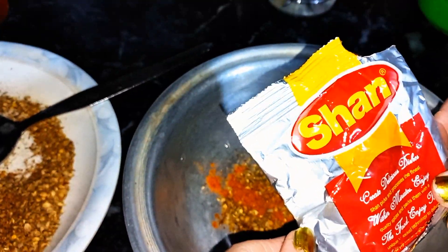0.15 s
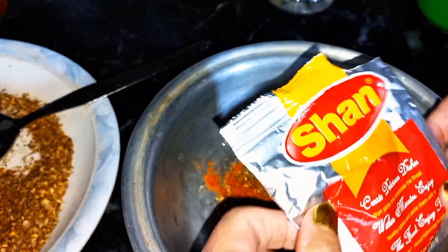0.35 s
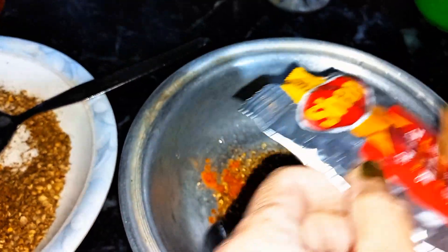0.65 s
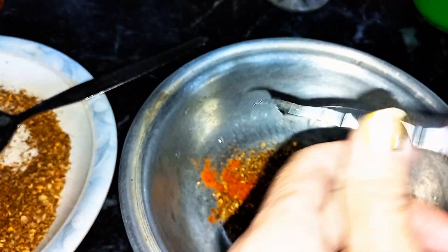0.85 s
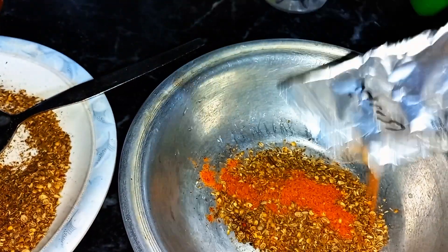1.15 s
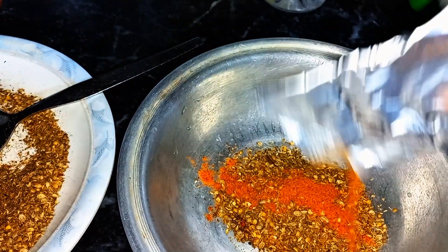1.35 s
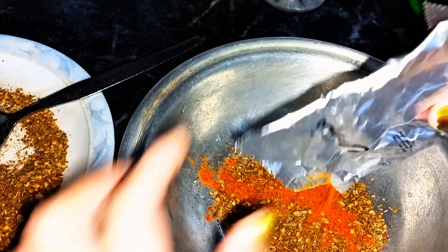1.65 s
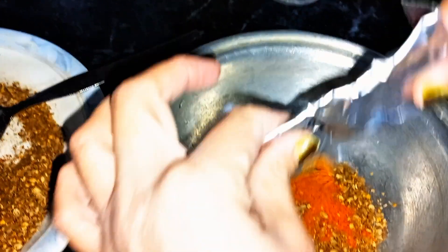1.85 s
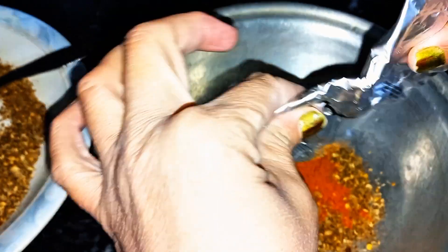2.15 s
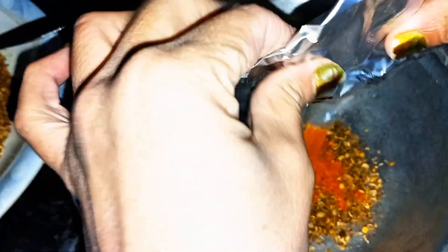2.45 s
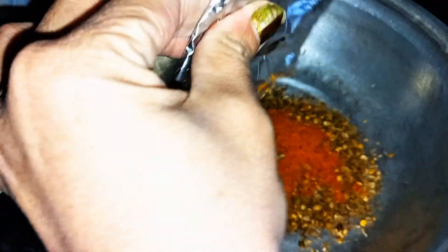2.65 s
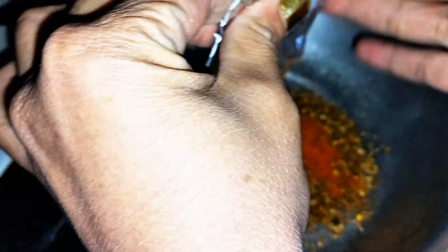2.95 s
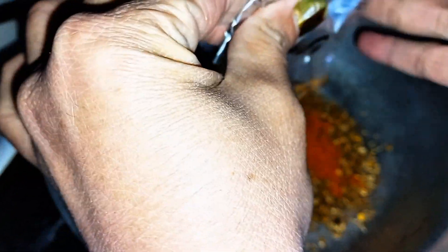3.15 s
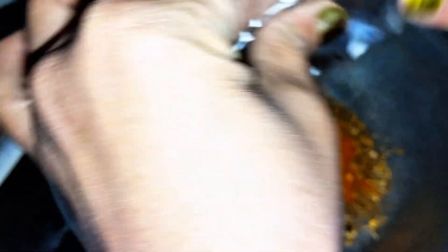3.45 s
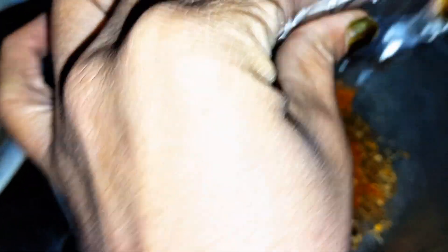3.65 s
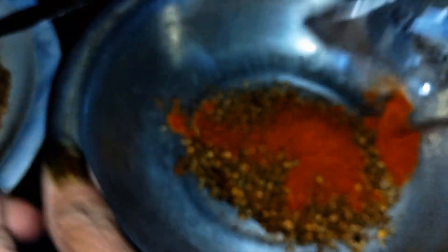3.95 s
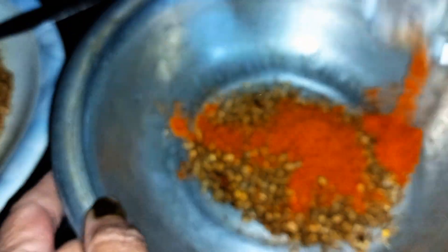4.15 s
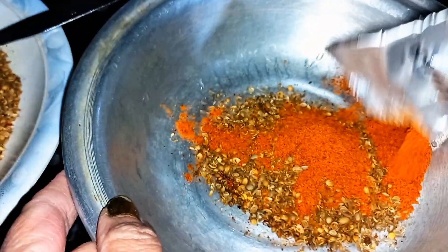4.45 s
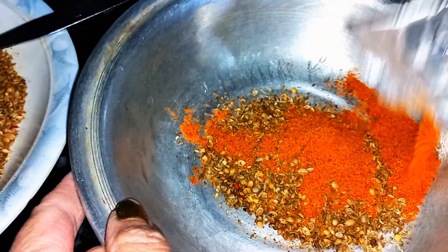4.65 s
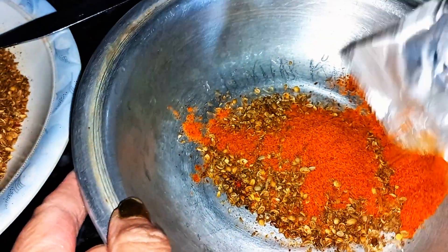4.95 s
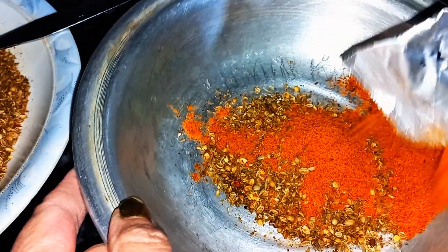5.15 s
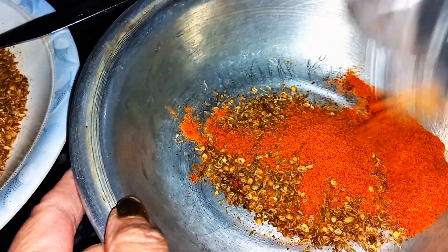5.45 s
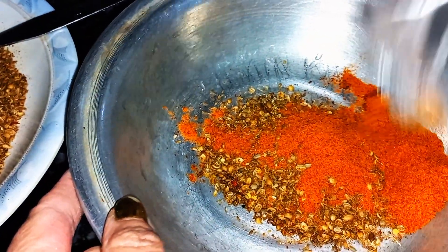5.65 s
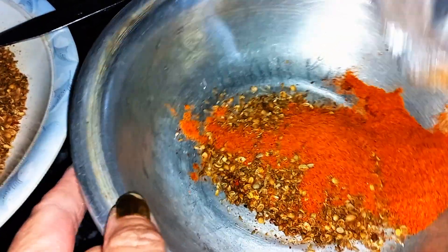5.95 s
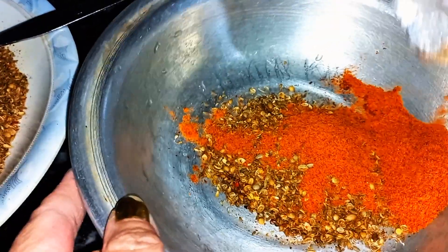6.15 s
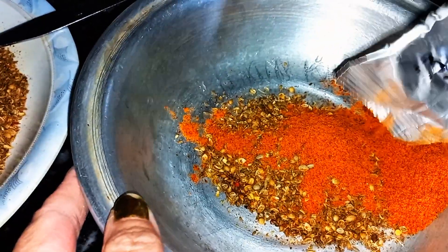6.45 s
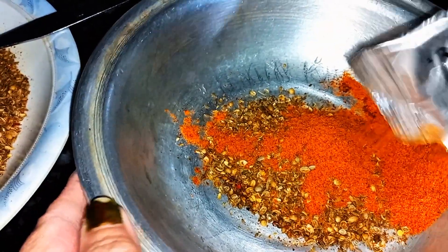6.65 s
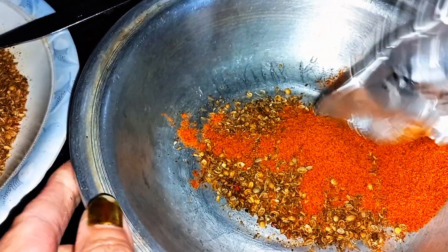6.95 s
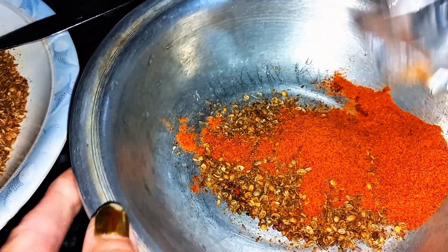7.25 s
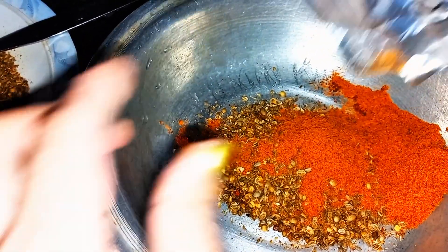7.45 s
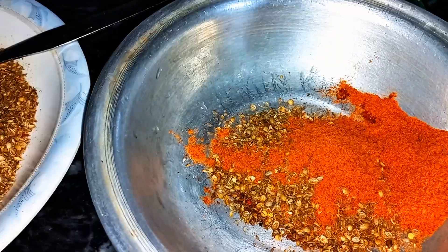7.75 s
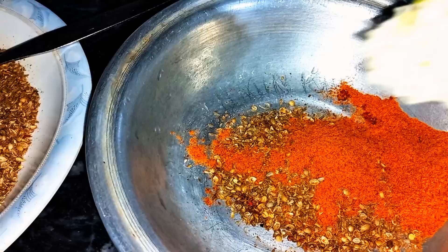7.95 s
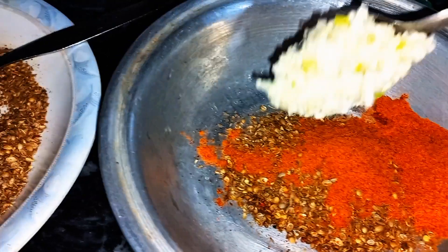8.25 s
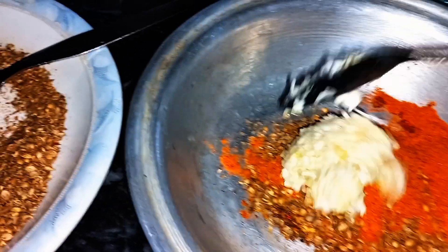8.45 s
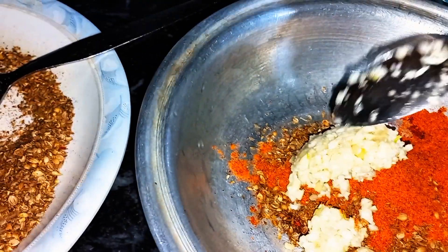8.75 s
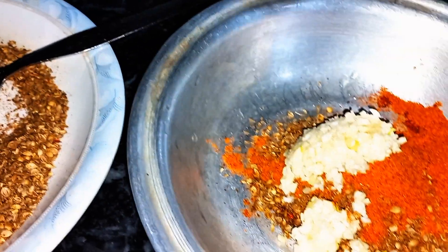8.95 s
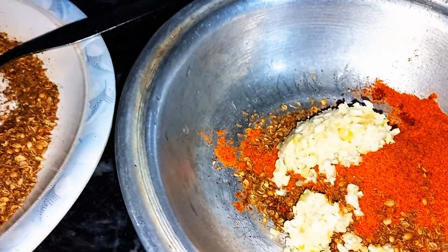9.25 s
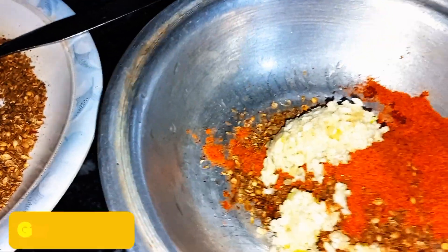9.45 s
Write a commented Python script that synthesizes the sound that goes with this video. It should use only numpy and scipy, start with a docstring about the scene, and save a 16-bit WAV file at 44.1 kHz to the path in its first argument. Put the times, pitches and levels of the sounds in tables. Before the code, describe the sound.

Close up in a small hard kitchen, a foil sachet crinkles with bright, dry snaps, mostly toward the left. Squeezing grows into dense crackling bursts, then regular shakes, about five or six a second, toss out powder with a soft hiss. After a last crackle the sound cuts abruptly to near quiet: low appliance hum, faint ticks and a few dull knocks on a steel bowl.

```python
"""In a small hard kitchen, a foil sachet is squeezed and shaken empty over a steel bowl, mostly louder in the left port.
Creases snap as bright cracks with ringing foil panels; tiny folds and hissing powder follow the hand movements.
Damped bowl modes knock, low pushes bump the table, narrow hisses slide by.
Feedback delays answer as the kitchen, over banded room noise and an appliance hum made of wavering tones.
Late on, a cut stops the echo and the hand movements of the first part short."""
import sys
import numpy as np
from scipy import signal
from scipy.fft import rfft, irfft, next_fast_len
from scipy.io import wavfile

SR = 44100
rng = np.random.default_rng(int(sys.argv[2]) if len(sys.argv) > 2 else 0)


def store_wav(level_fs):
    """Save 16-bit WAV to argv[1]."""
    pcm = np.round(np.clip(np.atleast_2d(level_fs), -1, 1) * 32767)
    wavfile.write(sys.argv[1], SR, pcm.T.astype(np.int16))


N = 423712   # samples
CUT_S = 7.719

# creases that snap loud or alone, and late faint ticks of the same kind:
# start_s, peak_db (before panning), treble_share_db, panel_pitch_hz, left_over_right_db
SNAPS = [(0.1697, -43, -16, 2280, 14), (0.363, -23, -13, 870, 6), (0.382, -20, -7.5, 2980, 6),
         (0.4052, -17.5, -1.5, 2250, 5), (0.434, -29.5, -16, 2210, 9), (0.508, -26.5, -10, 3080, 10),
         (0.5217, -8, 0, 2290, 4), (0.5445, -12, -2.5, 2230, 0), (0.6969, -22, -5, 1920, 6),
         (0.713, -22.5, -8, 2100, 5), (0.7299, -9, -4, 1740, 3.5), (0.7466, -14, 1, 3600, -9),
         (0.788, -25.5, -20, 1660, 3), (0.7694, -26, 1, 2860, -1), (0.7986, -28, -5, 1930, 7),
         (1.0066, -24.5, -4, 2500, 3), (1.0299, -15.5, -1, 2520, 2), (1.0963, -15, -0.5, 3000, 8),
         (1.6544, -42.5, -16, 1420, 15), (1.6958, -38, -21, 1740, 14), (1.7358, -27.5, -1, 3100, 6),
         (1.7757, -22, -1.5, 3470, 11), (1.8522, -26.5, -19, 1030, 4), (1.8826, -15.5, -6.5, 2080, 1),
         (1.9247, -13.5, -1.5, 1900, -6), (1.9386, -5, 0, 3120, 10), (1.9683, -13, -1.5, 2390, 5),
         (2.0133, -28, -25, 2020, 9), (2.024, -26, -29, 2350, 11), (2.0363, -5.5, -5, 2030, 1),
         (2.0417, -11.5, -4.5, 1250, 1), (2.0628, -15.5, -1.5, 1890, 5.5), (2.0923, -22, -12, 2250, 4),
         (2.1202, -23, -10, 1950, 1), (2.134, -15, -4, 2200, 3), (2.1514, -30, -21, 2150, 7),
         (2.167, -6, -1, 3450, 2), (2.2249, -28, 0, 2000, 2), (2.243, -26, 0, 2350, 4),
         (2.2498, -29, -9, 3620, 0), (2.28, -20.5, -0.5, 1960, 5), (2.356, -17.5, -5, 2060, 11.5),
         (2.3992, -33, -15, 2000, 4), (2.43, -16.5, -3.5, 2160, 5), (2.4648, -10.5, -2.5, 2160, 0),
         (2.4814, -10, -2, 1900, -6), (2.4886, -2.5, -1.5, 2330, 2), (2.5073, -17, -3, 1360, -1),
         (2.526, -21, -11, 2040, 3), (2.5364, -13, -1, 2140, 2), (2.545, -14, -2.5, 2220, 4),
         (2.5628, -16, -1.5, 2380, 3), (2.5995, -24, -5, 2200, 1), (2.7251, -31.5, -10, 1940, -1),
         (2.7628, -23, -8, 2080, 7), (2.7785, -27, 0, 860, 23), (2.9326, -18, -3.5, 2150, 7),
         (2.9658, -18.5, -2.5, 3070, 4), (3.0443, -21, -10, 2240, -3), (3.0598, -6, -3.5, 2220, 5),
         (3.0757, -8, -4, 2050, -3.5), (3.0847, -8.5, -6, 2330, 6), (3.0921, -9, 0, 2370, 10),
         (3.114, -25, -2, 2300, 0), (3.126, -12.5, -1.5, 2150, 4), (3.1435, -20, -6, 1920, 2),
         (3.21, -21, -11, 3700, 3), (3.2228, -10, -2, 2100, 5), (3.233, -2.5, -3.5, 1900, 2),
         (3.246, -14, -13, 2170, 5), (3.2557, -7, 1.5, 1830, -2), (3.263, -25, -18, 1790, -7),
         (3.2786, -17, -20, 2140, 14), (3.2978, -19, -12, 2100, -2), (3.308, -30.5, -12, 2630, 13),
         (3.342, -27, -6, 1970, 3), (3.3677, -17.5, -30, 2060, 3), (3.3776, -19.5, -9, 1980, 7),
         (3.3906, -33, -26, 2000, -5), (3.4381, -30, -28, 1970, -3), (3.454, -27, -5, 2000, 9),
         (3.471, -20.5, -20, 2000, 0), (3.4873, -17.5, -24, 2170, 3), (3.4955, -13, -25, 2320, 8),
         (3.51, -8.5, 0, 2110, 9), (3.513, -11, -8, 2280, 7), (3.5435, -18, -1, 1500, 2),
         (3.5583, -14, -1, 4000, -2), (3.6077, -28, -7, 2240, -4), (3.625, -12, -1, 2120, 3),
         (3.6495, -15, 1, 2090, 4), (3.6617, -27, -20, 734, 6), (3.6731, -25, -21, 726, 4),
         (3.682, -16.5, -2, 1840, 3), (3.7393, -12.5, -1, 2090, 7), (3.8308, -22.5, -1.5, 2680, 12),
         (3.8732, -23, -1.5, 2240, 8), (3.9555, -31.5, -14, 1480, 14.5), (4.0847, -24, -18, 1600, 7),
         (4.091, -12, -4, 2790, 2), (4.142, -13, -2, 1750, 6), (4.1713, -18.5, -1.5, 1830, 4),
         (4.2167, -19.5, -8.5, 1850, 0), (4.2357, -24, -9, 1790, 12), (4.2603, -18, -19, 2560, 5),
         (4.2726, -22.5, -11, 3250, 3), (4.3068, -19, -3, 2740, 5.5), (4.3212, -20, 0, 2970, 7),
         (4.4347, -12, -1, 2620, 5), (4.485, -21.5, -12, 3030, 10), (4.5328, -12, 0, 1700, 4.5),
         (4.6189, -16.5, -3.5, 2520, 7), (4.789, -13, -10.5, 2330, -1), (4.7945, -11, -1.5, 3400, -1),
         (4.972, -17.5, -6, 1790, 1.5), (5.0343, -20.5, -2, 2820, 11), (5.1461, -13, -12, 2370, 8),
         (5.3282, -19.5, -22, 1860, 5), (5.4694, -22.5, -4.5, 2150, 7), (5.5062, -17, -14, 2760, 7),
         (5.5446, -19.5, -5.5, 3070, 7.5), (5.6936, -6.5, -1, 1420, 3), (5.722, -14.5, 2, 3940, 4),
         (5.8753, -11.5, -4.5, 2390, 9.5), (5.8818, -5.5, 1, 2960, 5), (5.8988, -18, 2, 2390, 8),
         (5.935, -27, -6, 2800, 5), (6.054, -13, -19.5, 1180, 9.5), (6.104, -6.5, -1, 2000, 2.5),
         (6.2445, -10.5, -6, 2150, 11), (6.289, -5, -1, 3000, 1.5), (6.3109, -14, -3.5, 2420, 1.5),
         (6.37, -28.5, -5.5, 2430, 4), (6.4622, -16, -11, 1760, 7.5), (6.4897, -18.5, -3, 2220, 9),
         (6.6655, -11.5, -7.5, 2410, 3), (6.875, -29, -1.5, 1750, 3), (6.8998, -21.5, -6, 1630, 1.5),
         (6.948, -30, 2, 1850, -1), (6.973, -9, -8, 1450, 10.5), (7.204, -5, -2, 2370, -5),
         (7.208, -9, -4.5, 3100, 3), (7.4044, -27, -3.5, 1600, 3), (7.42, -34, -21, 2020, 13),
         (7.441, -28.5, -3.5, 2300, 1), (7.488, -36.5, -7, 2700, 9), (7.5094, -33.5, -17, 2380, 13),
         (7.549, -23.5, -2, 3660, 4), (7.6588, -16, -2.5, 1900, -4), (7.664, -8, 1.5, 2000, 10),
         (7.668, -7.5, -2, 1290, -2), (7.682, -15, -2, 2020, 9), (7.708, -11, -10.5, 3500, 5.5),
         (7.8794, -30.5, 0, 1390, 9), (8.545, -48, -3, 3800, 5), (8.579, -43, -8, 3300, 9.5),
         (8.648, -40, -13, 3800, 5)]
# side and folding of the sachet as it is tipped or shaken: time_s, left_port_delay_s, folding_db
SACHET_POSE = [(0, 0.000051, -1.5), (1.1, 0.00004, -3), (1.14, 0.000077, -15), (1.62, 0.000094, -6.5),
               (1.7, 0.000031, 0.5), (3.85, 0.000029, -2), (4.1, .00026, -8), (4.4, .00026, -8),
               (7.3, .00024, -7.5), (7.6, 0.000011, -0.5), (7.72, 0.0000076, 0.5), (7.76, 0.0000056, -8.5),
               (8.4, 0.0000067, -5), (8.47, 0.0000076, -1)]
# squeezes and other hand movements: height_s, handling_db, swell_s, die_s
SQUEEZES = [(0.244, -60, 0.022, .025), (0.31, -58, 0.058, 0.073), (0.442, -43, 0.12, 0.066),
            (0.54, -52.5, 0.13, 0.12), (0.742, -44, 0.056, 0.14), (1.04, -55, 0.18, 0.23),
            (1.187, -38.5, .08, 0.096), (1.359, -46, 0.068, 0.067), (1.527, -51.5, 0.14, .11),
            (1.698, -67, 0.091, 0.039), (1.77, -66, .05, .2), (1.87, -47, 0.064, 0.092),
            (1.934, -39.5, 0.045, 0.076), (2.045, -39, 0.02, 0.048), (2.12, -46.5, 0.062, 0.044),
            (2.19, -61, .05, .2), (2.287, -51.5, 0.18, 0.042), (2.361, -41.5, 0.033, .02),
            (2.486, -33.5, 0.069, 0.11), (2.772, -59.5, 0.057, 0.12), (2.933, -54, 0.076, 0.18),
            (3.082, -30, 0.048, 0.012), (3.139, -41, 0.036, 0.034), (3.238, -36, 0.063, 0.12),
            (3.504, -31.5, 0.057, 0.083), (3.636, -41.5, .085, .08), (3.743, -45, .05, 0.028),
            (3.84, -50.5, 0.17, 0.24), (3.927, -44.5, 0.066, 0.049), (6.915, -55, 0.22, .1),
            (7.453, -52, 0.093, 0.23), (7.672, -37, 0.028, 0.26), (7.91, -57, 0.12, 0.3),
            (8.5, -65, 0.17, 0.33), (8.642, -63, .14, 0.14), (9.558, -50, .014, 0.016),
            (9.606, -61.5, 0.17, .1)]
# shakes that throw the powder out: height_s, handling_db, die_s
SHAKES = [(4.098, -44, 0.15), (4.269, -34.5, 0.076), (4.448, -38, 0.11), (4.627, -36.5, .07),
          (4.801, -38.5, 0.11), (4.987, -37, 0.069), (5.15, -39.5, 0.088), (5.339, -37.5, 0.066),
          (5.518, -39.5, 0.082), (5.703, -39.5, 0.12), (5.885, -35, 0.097), (6.071, -39.5, 0.11),
          (6.269, -39, 0.18), (6.473, -39, 0.13), (6.677, -40.5, 0.14), (6.982, -35.5, 0.084),
          (7.214, -37.5, 0.11)]
# colour of the foil: pitch_hz, density_db (per Hz, relative)
FOIL_COLOUR = [(250, -9.5), (500, 3), (950, -9), (1300, -1), (2200, -2.5), (3500, -3), (5300, -4),
               (7400, -2), (8700, -8.5), (10000, -1.5), (12500, -7), (15500, -7)]
# colour of the sliding powder: pitch_hz, density_db (per Hz, relative)
POWDER_COLOUR = [(500, -22.5), (1200, 0), (2300, 4.5), (5000, 3.5), (8000, 4.5), (11000, 2), (15500, 3.5)]
# colour of the left port over the right: pitch_hz, difference_db
PORT_COLOUR = [(400, -2.5), (1300, 2.5), (2400, 6), (4400, -7), (8100, 6.5), (15000, 2)]
# brief narrow hisses, as of something sliding: start_s, length_s, pitch_hz, width_hz, level_db (before fades)
SLIDES = [(1.52, .1, 2100, 200, -60), (5.025, .13, 3200, 1100, -46.5), (5.75, .28, 3250, 700, -51),
          (7.95, .1, 2100, 400, -53), (8.0, .09, 1700, 900, -57), (8.22, .33, 1620, 300, -59),
          (8.6, .08, 3900, 1200, -63)]
# dull knocks on the bowl: start_s, then level_db of each bowl mode in turn
KNOCKS = [(2.357, -22, -38, -33, -50, -46), (3.663, -17.5, -30, -40, -50, -50),
          (3.234, -21, -9.5, -24, -40, -40), (6.2445, -16, -37, -23.5, -37, -40),
          (7.981, -22.5, -24.5, -24, -55, -36), (9.3111, -14.5, -28.5, -31.5, -62, -70),
          (9.5559, -23, -14.5, -28.5, -30, -24.5), (9.561, -48, -21, -36, -47, -48)]
# damped modes of the loaded bowl: pitch_hz, t60_s
BOWL_MODES = [(460, 0.012), (1110, 0.0098), (2100, 0.022), (2840, 0.016), (4400, 0.0023)]
# soft bumps through the table: start_s, level_db (the swell tops about 4 dB above it), pitch_hz
BUMPS = [(1.654, -42.5, 118), (1.66, -47, 60.3), (1.915, -53, 65), (5.37, -42, 116), (5.375, -59, 60),
         (7.069, -47.5, 79), (7.936, -39, 109), (9.189, -42, 113)]
# colour of the room noise: pitch_hz, density_db (per Hz, relative)
AIR_COLOUR = [(22, -49), (60, -39.5), (95, -9.5), (140, -13.5), (340, -9), (520, -14.5), (720, -25.5),
              (1550, -29.5), (1800, -33.5), (2700, -36.5), (3300, -81), (5000, -72.5), (6400, -46),
              (8800, -65.5), (13000, -45)]
# how alike the room noise is in both ports: pitch_hz, correlation (no unit)
AIR_LIKENESS = [(60, 0.92), (130, 0.99), (290, 0.92), (640, 0.8), (1410, 0.078), (3100, 0.25), (6820, 0.78),
                (15000, 0.98)]
# appliance hum: pitch_hz, width_hz, level_db (before the background curve)
HUM = [(63, 42, -70.5), (115, 11, -55.5), (171.2, 25, -62), (246.8, 10.1, -44.5), (332, 23, -59)]
# slow level curve of room noise and hum: time_s, gain_db
BACKGROUND_LEVEL = [(0, 1), (4.5, 2), (5.5, 2.5), (7.7, 1.5), (7.75, 1), (9.61, 0.5)]

SNAP_T60_S, PANEL_T60_S = 0.0043, 0.006
FLUTTER_T60_S, FLUTTER_DB = 0.043, -17   # level against the onset of the snap
PORT_SHARE = 0.53   # share of foil noise power common to both ports
SWING_DB, STILL_DB = 21, -82   # change per swell or die time; handling at rest
SHAKE_SWELL_S, SHAKE_HOLD_S = 0.075, 0.0087
CRACKLE_DB, CRACKLE_SPREAD_DB = 11.5, 4.5   # lesser creases, over the handling
CRACKLE_HZ, CRACKLE_DULL_DB = 2100, 23   # middle panel pitch; range of random treble loss
CRACKLE_FOLLOWS = 1.66   # dB of crackle for a dB of folding
FOLD_SPREAD_DB = 5.5
POWDER_DB = -4   # against the handling
KITCHEN_T60_S, KITCHEN_DB, WALL_CUT_HZ = 0.33, -21, 3900   # T60 before the walls take treble
AIR_DB = -48.5   # before the background curve
TOP_CUT_HZ = 15800


def amp(db):
    """dB to gain."""
    return 10 ** (np.asarray(db) / 20)


def rms_one(x):
    """Scale to rms 1 along time."""
    return x / np.sqrt(np.mean(x ** 2, axis=-1, keepdims=True) + 1e-20)


def in_time(rows, s):
    """Curve columns read at the times s."""
    t, *columns = np.transpose(rows)
    return [np.interp(s, t, c) for c in columns]


def at_hz(points, hz):
    """Curve read on a log frequency axis."""
    points = np.array(points)
    return np.interp(np.log(hz), np.log(points[:, 0]), points[:, 1])


def port_tilt(hz):
    """Colour difference of the ports in dB, half to each."""
    return np.outer([.5, -.5], at_hz(PORT_COLOUR, hz))


def drift(rate_hz):
    """Slow random wander of about spread 1: noise low-passed twice at rate_hz."""
    r = np.exp(-80 * np.pi * rate_hz / SR)     # one value per 40 samples
    noise = rng.standard_normal(N // 40 + 2002)
    slow = signal.lfilter([1], [1, -2 * r, r * r], noise)[2000:]
    return np.interp(np.arange(N) / 40, np.arange(len(slow)), rms_one(slow))


def decay(t, t60):
    """Fall of 60 dB in t60."""
    return amp(-60 * t / t60)


def resonance(x, hz, width_hz):
    """Two-pole resonance, gain about 1 on top."""
    r = np.exp(-np.pi * width_hz / SR)
    poles = [1, -2 * r * np.cos(2 * np.pi * hz / SR), r * r]
    return signal.lfilter([(1 - r * r) / 2, 0, (r * r - 1) / 2], poles, x)


def creases(s, peak_db, treble_db, panel_hz, pan_db, size):
    """A crease is a bright crack plus a panel of foil ringing near one pitch, then a short flutter."""
    t = np.arange(size) / SR
    hz = np.maximum(np.fft.rfftfreq(size, 1 / SR), 30)
    noise = rng.standard_normal((len(s), 3, size))
    # each port hears the foil from its own side
    heard = rfft(np.sqrt(PORT_SHARE) * noise[:, :1] + np.sqrt(1 - PORT_SHARE) * noise[:, 1:])
    left_delay = in_time(SACHET_POSE, s)[0]
    heard[:, 0] *= np.exp(-2j * np.pi * np.outer(left_delay, hz))
    heard *= amp(at_hz(FOIL_COLOUR, hz) + port_tilt(hz))

    octaves = np.log2(hz / panel_hz[:, None, None])
    body = (np.exp(-(octaves / 0.22) ** 2) + 0.46) / (1 + (hz / 4800) ** 8)
    crack_hz = 5500 * 3.63 ** rng.random((len(s), 1, 1))     # every fold cracks with a colour of its own
    crack_octaves = np.log2(hz / crack_hz)
    bright = (np.exp(-(crack_octaves / 0.36) ** 2) + 0.98) / (1 + (4800 / hz) ** 8)

    flutter = amp(FLUTTER_DB) * decay(t, FLUTTER_T60_S)
    crack_shape = (decay(t, SNAP_T60_S) + flutter) * np.minimum(t / 0.00017, 1)
    panel_shape = (decay(t, PANEL_T60_S) + flutter) * np.minimum(t / 0.0015, 1)
    crack = rms_one(irfft(heard * bright, size) * crack_shape)
    panel = rms_one(irfft(heard * body, size) * panel_shape)
    treble = np.clip(amp(treble_db), .02, .98)[:, None, None]
    snap = treble * crack + np.sqrt(1 - treble ** 2) * panel
    snap *= (amp(peak_db) / np.abs(snap).max(axis=(1, 2)))[:, None, None]
    snap *= amp(np.outer(pan_db, [.5, -.5]))[:, :, None]

    # add every snap at its start
    at = (np.round(s * SR).astype(int)[:, None] + np.arange(size)).ravel()
    return np.array([np.bincount(at, snap[:, k].ravel(), N + size)[:N] for k in range(2)])


def handling(s):
    """Hand level in dB at the times s: movements swell and die; those of the first part stop at the cut."""
    power = np.full(len(s), amp(2 * STILL_DB))
    moves = [(*squeeze, 0) for squeeze in SQUEEZES]
    moves += [(top, db, SHAKE_SWELL_S, die, SHAKE_HOLD_S) for top, db, die in SHAKES]
    for top, level_db, swell, die, hold in moves:
        before = (top - hold / 2 - s) / swell
        after = (s - top - hold / 2) / die
        away = np.maximum(np.maximum(before, after), 0)
        near = (away < 3) & ((s < CUT_S) | (top > CUT_S))
        power[near] += amp(2 * (level_db - SWING_DB * away[near]))     # twice the dB gives power
    return 10 * np.log10(power)


def crackle():
    """Lesser, duller creases start at random moments up to the cut, as strong as handling and pose allow."""
    draw = rng.random((round(50 * CUT_S), 5))     # 50 a second
    s = draw[:, 0] * CUT_S
    chance_db = -CRACKLE_SPREAD_DB * np.log(np.maximum(draw[:, 1], .1))
    folding_db = CRACKLE_FOLLOWS * in_time(SACHET_POSE, s)[1]
    size_db = handling(s) + folding_db + CRACKLE_DB + chance_db
    treble_db = -5 - CRACKLE_DULL_DB * draw[:, 2]
    panel_hz = CRACKLE_HZ * 1.5 ** (draw[:, 3] - .5)
    return creases(s, size_db, treble_db, panel_hz, 11 * draw[:, 4], size=1280)


def rustle():
    """Many small folds at random moments with uneven sizes, over the fine hiss of sliding powder."""
    draw = rng.random((600 * N // SR, 4))     # 600 folds a second
    s = draw[:, 0] * N / SR
    chance_db = -FOLD_SPREAD_DB * np.log(np.maximum(draw[:, 1], 1 / 12))
    size_db = handling(s) + in_time(SACHET_POSE, s)[1] + 2.77 + chance_db
    treble_db = -1.5 - 1.4 * draw[:, 2]
    panel_hz = 900 * 4.2 ** draw[:, 3]
    folds = creases(s, size_db, treble_db, panel_hz, rng.normal(7.0, 10.6, len(s)), size=320)

    hz = np.maximum(np.fft.rfftfreq(N, 1 / SR), 30)
    colour = amp(at_hz(POWDER_COLOUR, hz) + port_tilt(hz))
    powder = irfft(rfft(rng.standard_normal((2, N))) * colour, N)
    flicker_db = 2 * drift(60)
    powder_gain = amp(handling(np.arange(N) / SR) + POWDER_DB + flicker_db)
    return folds + powder_gain * powder / np.std(powder)


def knocks():
    """Each knock sets the damped modes of the loaded bowl ringing, each with a rattling tail."""
    out, t = np.zeros(N + 4000), np.arange(4000) / SR
    onset = np.sin(np.pi / 2 * np.minimum(t / 0.0013, 1)) ** 2
    for s, *mode_db in KNOCKS:
        for db, (hz, t60) in zip(mode_db, BOWL_MODES):
            wide = resonance(rng.standard_normal(4000), hz, 0.69 * hz)
            rattle = rms_one(resonance(wide, hz, 0.31 * hz)) * amp(-22.5) * decay(t, 0.076)
            ring = decay(t, t60) * np.sin(2 * np.pi * hz * t)
            out[round(s * SR):][:4000] += amp(db) * (ring + rattle) * onset
    return out[:N]


def slides():
    """A slide is noise sent twice through one resonance, swelling and fading."""
    out = np.zeros((2, N))
    for s, length, hz, width_hz, level_db in SLIDES:
        noise = rng.standard_normal((2, round(length * SR)))
        hiss = rms_one(resonance(resonance(noise, hz, width_hz), hz, width_hz))
        size = hiss.shape[1]
        out[:, round(s * SR):][:, :size] += amp(level_db) * hiss * np.hanning(size) ** 0.19
    return out


def bumps():
    """A bump is a dull low push that dies in a few cycles."""
    out, t = np.zeros(N + 8000), np.arange(8000) / SR
    swell = t / 0.013 * np.exp(1 - t / 0.021)
    for s, level_db, hz in BUMPS:
        out[round(s * SR):][:8000] += amp(level_db) * np.sin(2 * np.pi * hz * t) * swell
    return out[:N]


def kitchen(x):
    """Walls as eight feedback delays a side, duller on every round, evaluated on a frequency grid."""
    size = next_fast_len(N + SR)
    w = 2 * np.pi * np.fft.rfftfreq(size)
    dull = np.exp(-2 * np.pi * WALL_CUT_HZ / SR)
    wall = (1 - dull) / (1 - dull * np.exp(-1j * w))
    walls = np.zeros((2, len(w)), complex)
    for k, lag_s in enumerate(rng.uniform(0.0055, 0.026, 16)):
        loop = decay(lag_s, KITCHEN_T60_S) * wall * np.exp(-1j * w * round(lag_s * SR))
        walls[k % 2] += loop / (1 - loop) * (-1) ** (k // 2)
    before = np.arange(N) < CUT_S * SR     # no echo rings on across the cut
    parts = rfft([x * before, x * ~before], size)[:, None]
    first, second = irfft(parts * walls, size)[..., :N]
    return first * before + second


def room_noise():
    """Half-octave bands of coloured noise, each with its own flicker and likeness between the ports."""
    out, edges = 0, 22 * 2 ** np.arange(0, 9.6, .5)     # Hz
    hz = np.maximum(np.fft.rfftfreq(N, 1 / SR), 10)
    coloured = irfft(rfft(rng.standard_normal((2, 2, N))) * amp(at_hz(AIR_COLOUR, hz)), N)
    for k, (low, high) in enumerate(zip(edges, edges[1:])):
        band = signal.butter(2, [low, high], "band", fs=SR, output="sos")
        mid, side = signal.sosfilt(band, coloured[k % 2])     # neighbouring bands use separate noise
        alike = np.clip(at_hz(AIR_LIKENESS, np.sqrt(low * high)), -1, 1)
        flicker = amp(1.86 * drift(9.7))
        out = out + flicker * (np.sqrt(1 + alike) * mid + np.sqrt(1 - alike) * side * [[1], [-1]])
    return amp(AIR_DB) * out / np.std(out)


def appliance_hum():
    """Each hum is a tone of unsteady pitch plus noise in a resonance at the same pitch."""
    out = np.zeros((2, N))
    for hz, width_hz, level_db in HUM:
        noise = 0.35 * rng.standard_normal((2, N)) + rng.standard_normal(N)     # mostly common to both ports
        narrow = rms_one(resonance(noise, hz, width_hz))
        tone = np.sin(np.cumsum(2 * np.pi * hz / SR * (1 + 0.014 * drift(35))))
        out += amp(level_db) * rms_one(tone + 0.49 * narrow)
    return out


def background():
    """Room noise and appliance hum follow one slow level curve."""
    level_db = in_time(BACKGROUND_LEVEL, np.arange(N) / SR)[0]
    return (room_noise() + appliance_hum()) * amp(level_db)


def scene():
    """Near sounds and their echo, bumps and background."""
    near = creases(*np.transpose(SNAPS), size=1280) + crackle() + rustle() + knocks() + slides()
    no_bass = signal.butter(2, 220, "high", fs=SR, output="sos")     # small things radiate no bass
    near = signal.sosfilt(no_bass, near)
    echo = amp(KITCHEN_DB) * kitchen(near.mean(axis=0))
    return near + echo + bumps() + background()


def record(dry):
    """The highest peaks are rounded, the top is cut steeply."""
    rounded = 1.1 * np.tanh(dry / 1.1)
    top_cut = signal.ellip(12, .5, 70, TOP_CUT_HZ, fs=SR, output="sos")
    return signal.sosfilt(top_cut, rounded)


dry = scene()
out = record(dry)
store_wav(out)
```